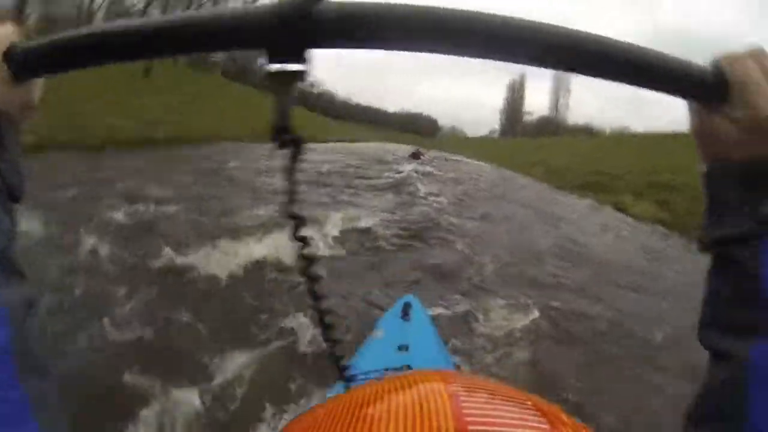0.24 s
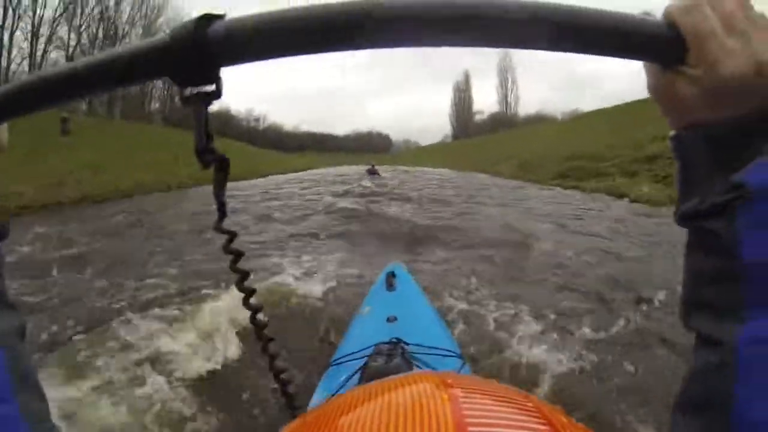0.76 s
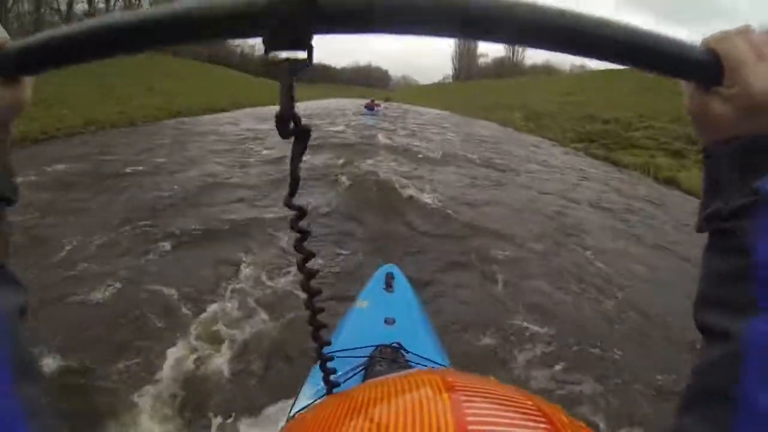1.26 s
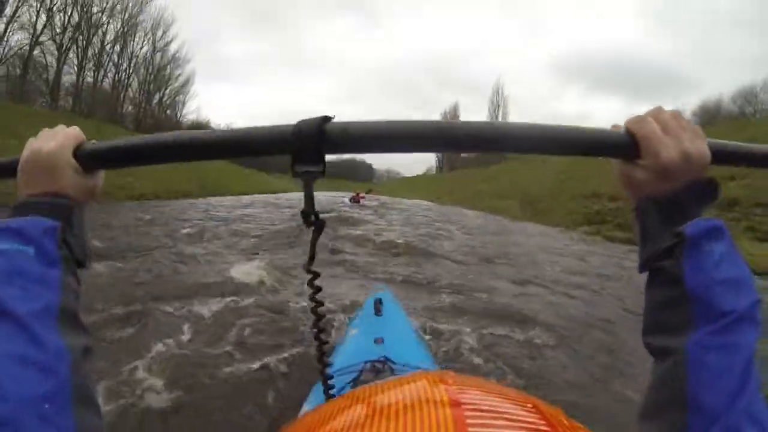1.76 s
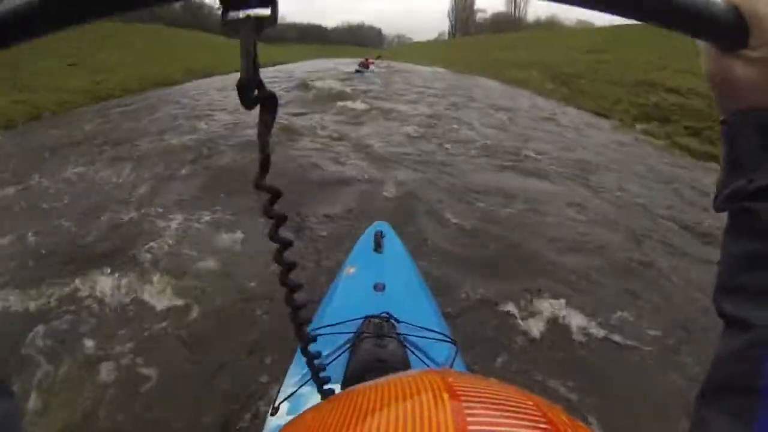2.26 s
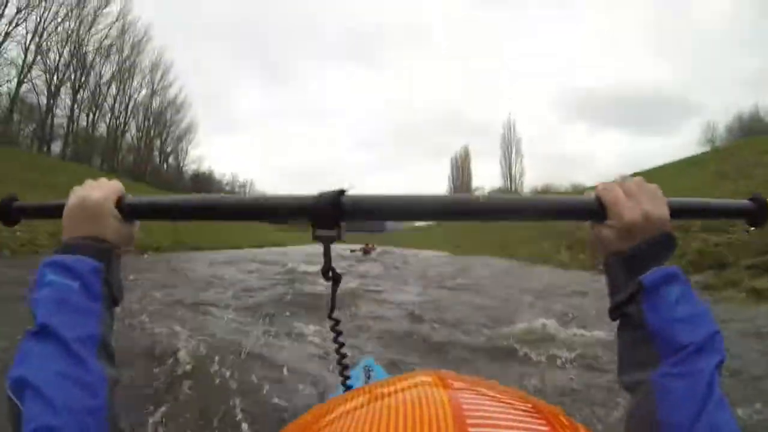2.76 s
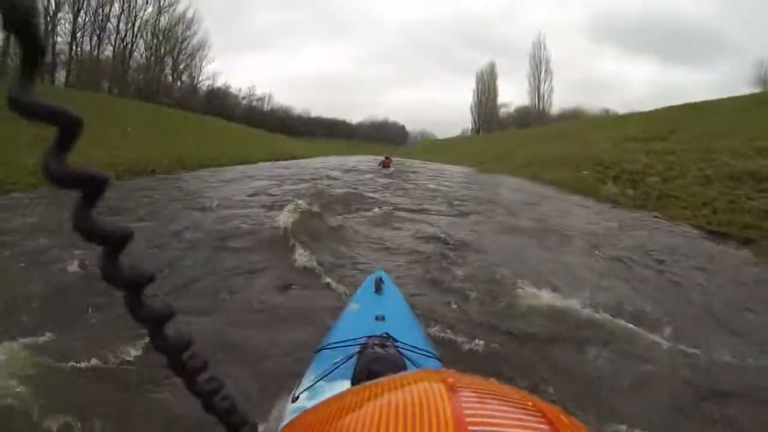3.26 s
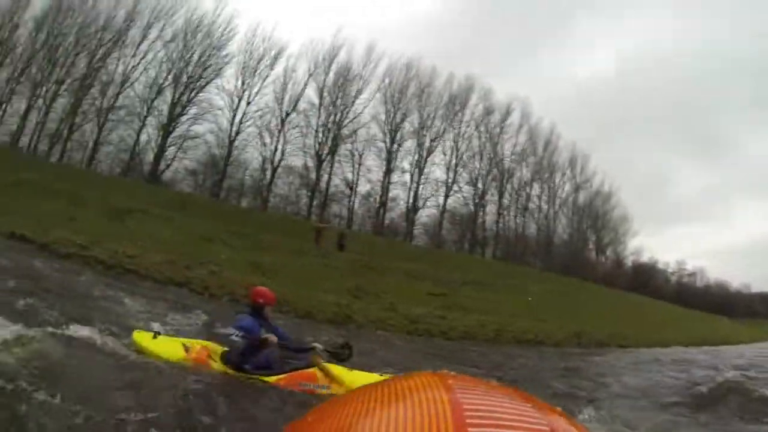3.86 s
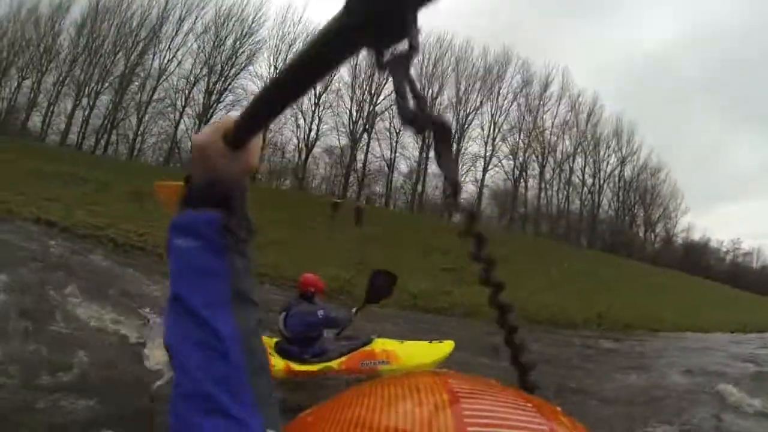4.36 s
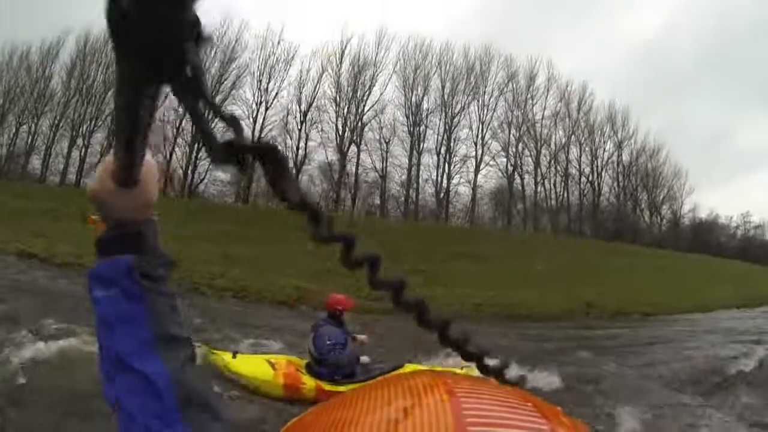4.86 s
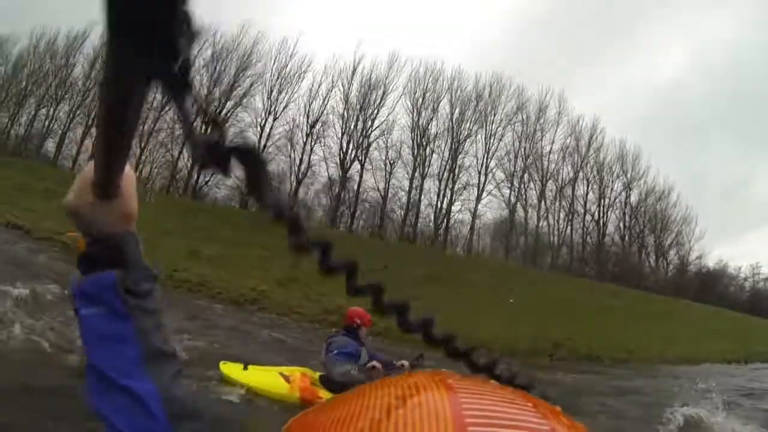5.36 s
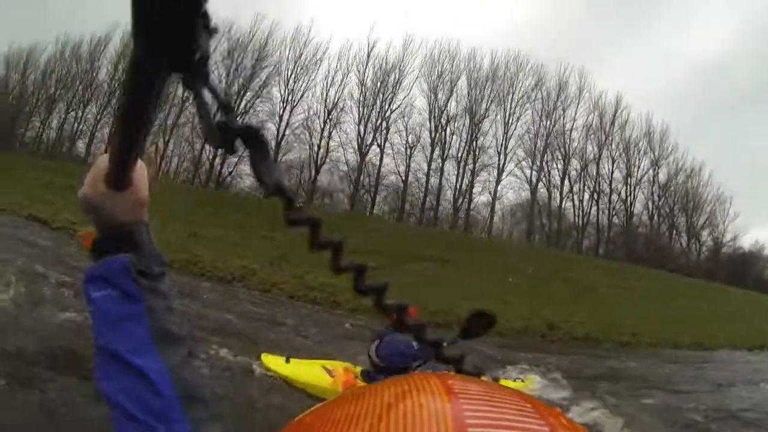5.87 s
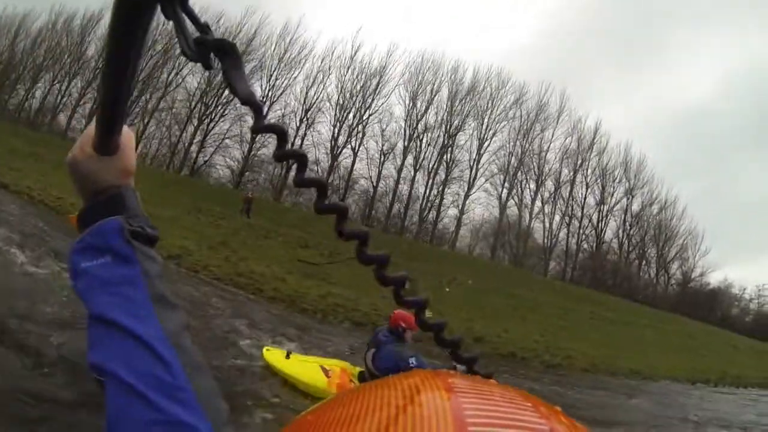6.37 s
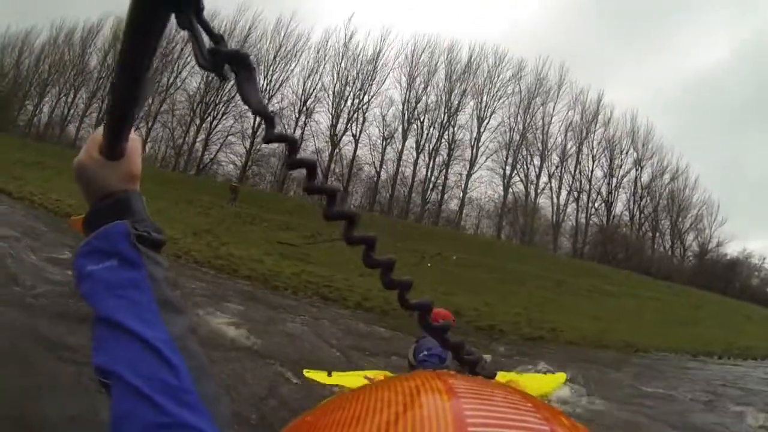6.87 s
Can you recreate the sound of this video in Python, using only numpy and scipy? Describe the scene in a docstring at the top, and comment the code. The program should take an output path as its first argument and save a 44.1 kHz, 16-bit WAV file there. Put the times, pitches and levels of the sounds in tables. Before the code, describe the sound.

A small river rapid rushes and fizzes around a kayak, with splashes slapping close by and low wind gusts buffeting the microphone.

```python
"""First comes the hiss and bubbling of a small river rapid, with wind throbbing deeply under it.
A kayak runs through, heard from a camera on the paddler; its waterproof case colours the water's sound.
Splashes slap the case, water sloshes on the hull, spray sputters and the paddle's leash knocks once.
Wind swirls around the case in low booms and rumbling gusts. Its hardest blows set off the camera's
limiter, an automatic volume control, so the water ducks and swells back."""
import sys
import numpy as np
from scipy import signal
from scipy.fft import rfft, irfft
from scipy.io import wavfile
from scipy.ndimage import uniform_filter1d

SR = 44100
rng = np.random.default_rng(int(sys.argv[2]) if len(sys.argv) > 2 else 0)


def materialize(psi):
    """Save the field psi as 16-bit PCM at rate SR to the path in sys.argv[1].

    A 1-D psi becomes a single channel; in a 2-D psi each row is a channel.
    """
    bounded = np.clip(np.atleast_2d(psi).T, -1, 1)
    quanta = np.round(bounded * 32767).astype(np.int16)
    wavfile.write(sys.argv[1], SR, quanta)


N = 313992

# The river along the run (time [s], rush level [dB], foam level [dB])
RIVER_LEVELS = [(0, -39.5, -56.5), (0.8, -43, -58.5), (1.45, -40, -61.5), (1.8, -43.5, -62),
                (2.65, -44.5, -63), (3.1, -49, -65.5), (3.5, -45, -61.5), (3.8, -50, -61.5),
                (4.05, -44, -61), (4.4, -52.5, -66.5), (4.7, -44, -60.5), (4.95, -45, -62),
                (5.25, -46.5, -61.5), (5.6, -46.5, -61.5), (6.15, -51.5, -69.5), (6.5, -50, -65.5),
                (7.12, -45.5, -63)]
# Waves breaking on the bow (crest time [s], length [s], rush boost [dB], foam boost [dB])
BOW_WAVES = [(0.342, 0.1, 2, 2), (0.77, 0.16, 4, 4), (1.205, 0.11, 2.5, 3), (2.354, 0.039, 6, 7),
             (2.844, 0.17, 4, 5.5), (3.293, 0.14, 3.5, 1.5), (4.46, 0.24, 7, 5), (6.38, 0.21, 7, 3),
             (6.453, 0.024, 1, 7.5)]
# Tone of the rushing water (frequency [Hz], relative level [dB])
RUSH_TONE = [(250, -17.5), (480, -16), (720, -16), (900, -12), (1100, -7), (1330, 0), (1550, -0.5),
             (1900, -9), (2500, -9.5), (3250, -13.5), (3800, -19.5), (4900, -31.5), (6500, -37.5),
             (12000, -45.5)]
# Tone of the fizzing foam (frequency [Hz], relative level [dB])
FOAM_TONE = [(2500, -13), (3900, -2), (4400, 1.5), (5100, 0.5), (5800, -7.5), (7000, -11), (8500, -14.5),
             (12000, -16.5), (14000, -25)]
# Slaps on the case (time [s], strength [dB], trapped air pitch [Hz], hollow ring [dB], bright ring [dB])
WATER_SLAPS = [(1.341, -32, 1520, -45, -30), (1.422, -23.5, 1550, -29, -23), (2.19, -28.5, 1440, -28, 2),
               (2.35, -20, 1440, -14.5, -9), (2.489, -19, 1190, -33, -16), (2.983, -28.5, 1393, -7, -25),
               (3.134, -21.5, 1520, -7, 4.5), (3.149, -15.5, 1340, -7, -26), (3.164, -25, 1230, -5, 0),
               (3.244, -29, 1310, -29, -11), (3.372, -31, 1280, 5, -20), (3.515, -23.5, 1900, -31, -16),
               (4.32, -22, 1250, 3, -18), (4.371, -20.5, 1280, -6.5, -9), (4.64, -22.5, 1210, -3, -31),
               (5.17, -22.5, 1260, -4, -25), (5.196, -20.5, 1310, -4, -22), (5.219, -21.5, 1260, -2.5, -13),
               (5.352, -33, 1250, -10, -23), (5.377, -25, 1140, -3, -13), (5.451, -32.5, 1290, 0, -23),
               (5.489, -21.5, 1150, -9, -22), (5.524, -29, 1130, -13, -22), (5.732, -17, 1450, -10, -22),
               (5.941, -31, 1390, -5, -28), (6.448, -32, 1600, -23, -5)]
# Sloshes against the hull (time [s], strength [dB], pitch [Hz], length [s])
HULL_SLOSHES = [(0.527, -35.5, 1600, 0.0094), (0.552, -33, 1550, 0.018), (0.658, -35.5, 1400, 0.0095),
                (0.662, -35.5, 3100, 0.0079), (0.85, -38.5, 1500, 0.02), (1.04, -46.5, 1450, 0.014),
                (1.171, -42, 1490, 0.018), (2.341, -34.5, 1890, 0.017), (3.976, -40, 1470, 0.019),
                (4.45, -42, 1370, 0.016), (5.471, -35, 1420, 0.01), (5.488, -29, 1290, 0.011),
                (5.524, -33, 1430, 0.014), (5.627, -41, 1380, 0.023), (5.668, -37, 1490, 0.022),
                (5.694, -31, 1530, 0.02), (5.723, -28.5, 1550, 0.016), (5.764, -32, 1560, 0.014),
                (5.815, -39, 1450, 0.026), (5.91, -29.5, 1520, 0.015), (5.94, -34.5, 1470, 0.015),
                (5.983, -38.5, 1350, 0.015), (6.342, -50.5, 2820, 0.028), (6.409, -45.5, 2600, 0.044)]
# Fine spray, thicker after the bow plunges into a wave (time [s], typical rate [drops/s])
SPRAY_RATES = [(2.2, 1), (2.5, 6), (4.2, 10), (4.7, 70), (5.3, 40), (5.7, 75), (6.2, 65), (6.6, 30),
               (6.8, 3)]
# The sharpest drops of spray (time [s], strength [dB])
BIG_DROPS = [(2.4824, -58), (2.605, -38), (3.002, -39.5), (4.158, -41), (4.5164, -44), (4.597, -42),
             (4.63, -39), (4.641, -40), (4.688, -46), (4.7363, -35.5), (4.7938, -46), (4.8115, -40),
             (5.006, -39), (5.068, -45), (5.575, -38), (5.583, -49), (5.6104, -49), (5.663, -46),
             (5.725, -41), (5.8092, -45), (5.815, -39), (5.912, -44), (5.987, -43), (5.991, -41),
             (6.002, -42), (6.0083, -47), (6.0544, -51), (6.062, -41.5), (6.088, -46), (6.153, -44),
             (6.166, -45), (6.447, -45), (6.455, -38), (6.4804, -43), (6.504, -45), (6.534, -51),
             (6.581, -62)]
# The leash hits the case and chatters (time [s], relative strength [dB])
LEASH_HITS = [(4.2426, -4), (4.245, 0), (4.2503, -20)]
# What rings in that knock (pitch [Hz], width [Hz], relative level [dB])
KNOCK_RINGS = [(713, 280, -5.5), (1190, 480, 2), (1470, 98, -23), (2400, 310, -12), (3100, 830, -20)]
# The wind's strength, heard as its throb (time [s], level [dB])
WIND_LEVELS = [(0, -21), (0.3, -28), (0.42, -15.5), (0.66, -18.5), (0.85, -22), (1.5, -31.5), (1.68, -24),
               (2, -29.5), (2.38, -22), (2.56, -14.5), (2.8, -23), (3.4, -19), (3.7, -17), (4, -20.5),
               (4.55, -12.5), (5.35, -15), (5.7, -14), (6.5, -18), (6.8, -22)]
# The hardest blows of wind (time [s], peak before the limiter [dB])
WIND_BLOWS = [(2.611, -6.5), (3.009, -11), (3.613, -7.5), (3.843, -9.5), (4.2, -2), (4.556, 1.5),
              (4.83, -5.5), (5.029, -3.5), (5.321, -4.5), (5.549, -6), (5.751, -5.5), (6.011, -5),
              (6.181, -4), (6.489, -7.5)]
# Booms as the air around the case briefly swings (middle time [s], length [s], strength [dB], pitch [Hz])
WIND_BOOMS = [(0.555, 0.047, -17.5, 29), (0.858, 0.15, -16.5, 30.3), (1.678, 0.07, -16.5, 31.6),
              (2.429, 0.1, -14.5, 29.7), (2.592, 0.081, -19, 63.5), (2.905, 0.066, -13, 35),
              (2.998, 0.051, -21.5, 50), (3.155, .11, -14.5, 33.1), (3.386, 0.092, -13, 31),
              (3.496, 0.085, -12.5, 32.3), (4.078, 0.1, -14.5, 30.4), (4.543, 0.023, -19, 51),
              (5.011, 0.072, -16, 27.6), (5.257, 0.16, -11.5, 26.1), (5.519, 0.1, -14, 27.4)]
# Gusts that catch the case (time [s], length [s], flutter level [dB], buzz pitch [Hz])
WIND_GUSTS = [(0.046, 0.013, -41, 120), (0.42, 0.032, -49, 111), (0.564, 0.039, -49, 149),
              (1.643, 0.04, -42, 140), (1.71, 0.026, -40, 127), (1.828, 0.027, -47, 127),
              (2.054, 0.012, -41.5, 182), (2.25, .1, -48, 100), (2.382, 0.072, -48, 100),
              (2.453, 0.076, -40.5, 114), (2.556, 0.12, -38, 99.5), (2.725, 0.015, -42, 150),
              (2.838, 0.015, -37, 170), (2.888, 0.037, -30, 130), (2.971, 0.014, -26.5, 190),
              (3.128, 0.036, -32, 171), (3.36, 0.053, -31.5, 128), (3.477, 0.022, -31.5, 126),
              (3.537, 0.09, -38, 129), (3.923, 0.013, -39, 109), (4.045, 0.04, -31.5, 169),
              (4.11, 0.12, -42.5, 110), (4.289, 0.038, -31.5, 194), (4.356, 0.053, -35.5, 139),
              (4.51, 0.085, -42, 131), (4.99, 0.13, -39, 130), (5.206, 0.1, -40, 128),
              (5.352, 0.012, -26.5, 130), (5.435, 0.18, -42, 111), (6.414, 0.03, -45, 171),
              (7.08, 0.042, -43, 118)]
# Tone of the crackle that pulses with the throb (frequency [Hz], relative level [dB])
CRACKLE_TONE = [(70, 18), (130, 5.5), (250, 4), (450, -1.5), (750, -3.5), (1100, -7), (2500, -14.5),
                (6000, -33), (12000, -46.5)]
# Tone of the wind's rumble (frequency [Hz], relative level [dB])
RUMBLE_TONE = [(16, 15.5), (24, 1.5), (33, 2.5), (45, -4.5), (65, -42.5), (100, -41.5), (200, -42.5)]
# Tone of the wind's flutter (frequency [Hz], relative level [dB])
FLUTTER_TONE = [(60, 10.5), (85, 1.5), (120, 8), (180, -4.5), (260, -18), (380, -32), (700, -21.5),
                (1500, -24.5)]
# Two ways the case rings (pitch [Hz], width [Hz])
HOLLOW_RING, BRIGHT_RING = (820, 320), (2550, 340)


def river():
    """Nearby bubbles ring over the rapid's smooth rush and bursting foam fizzes; waves swell both."""
    rush_db, fizz_db = in_time(RIVER_LEVELS)
    for s, length, rush_boost_db, foam_boost_db in BOW_WAVES:
        swell = np.exp(-(2 * (np.arange(N) / SR - s) / length) ** 2)
        rush_db, fizz_db = rush_db + rush_boost_db * swell, fizz_db + foam_boost_db * swell
    water = rng.standard_normal(N) + from_db(-8) * bubbles(per_s=1800, spread_db=2, cycles=38)
    # clouds of same-sized bubbles come and go, so the tone keeps shifting
    clouds = sum(0.078 * drift(23) * resonance(water, hz, 0.33 * hz) for hz in (1230, 1600, 2200, 3100))
    rush = coloured(water + clouds, RUSH_TONE) * from_db(rush_db + 1.05 * drift(27))
    foam = rng.standard_normal(N) + from_db(-6) * rms_one(grains(per_s=2000, spread_db=6.5))
    fizz = coloured(foam, FOAM_TONE) * from_db(fizz_db + 1.9 * drift(30))
    return rush + fizz


def bubbles(per_s, spread_db, cycles, count=40):
    """Each bubble rings briefly at a pitch set by its size."""
    births, sizes = grains(per_s, spread_db), rng.integers(0, count, N)
    rings = (np.sqrt(hz) * rms_one(resonance(births * (sizes == k), hz, 2 * hz / cycles))
             for k, hz in enumerate(np.geomspace(600, 7000, count)))
    return rms_one(sum(rings))


def slaps(size=2400):
    """A lump of water lands amid a short spatter: its trapped air and the case ring together."""
    lead = int(0.003 * SR)
    out, t = np.zeros(N + size), (np.arange(size) - lead) / SR
    for s, db, air_hz, hollow_db, bright_db in WATER_SLAPS:
        push = from_db(-25) * rng.standard_normal(size) * np.exp(-np.abs(t) / 0.0045)
        push[lead] = 1  # the lump itself
        rings = [(air_hz, 450, 0), (*HOLLOW_RING, hollow_db), (*BRIGHT_RING, bright_db)]
        slap = sum(from_db(ring_db) * rms_one(ring(push, hz, width)) for hz, width, ring_db in rings)
        slap = cut(slap, 1850, "low", order=3)
        at = int(s * SR) - lead
        out[at:at + size] += from_db(db) * slap / np.abs(slap).max()
    return out[:N]


def sloshes(size=6000, pockets=50):
    """Water folds against the hull: pockets of air rattle unevenly over a hollow gurgle."""
    gap_s, ring_s, spread_octaves, spread_db, gurgle_db = 0.002, 0.0008, 0.15, 3, -17
    out, t = np.zeros(N + size), np.arange(size) / SR
    gurgles = ring(rng.standard_normal((len(HULL_SLOSHES), size)), *HOLLOW_RING)
    for (s, db, hz, length), gurgle in zip(HULL_SLOSHES, gurgles):
        late, detune, strength = rng.standard_normal((3, pockets, 1))
        since = np.maximum(t - gap_s * (np.arange(pockets)[:, None] + 0.327 * late), 0)
        pocket_hz = hz * 2 ** (spread_octaves * detune)
        rings = since * np.exp(-since / ring_s) * np.sin(2 * np.pi * pocket_hz * since)
        rattle = np.sum(from_db(spread_db * strength) * rings, axis=0)
        age = t / (length / 2)
        swell = (age * np.exp(1 - age)) ** 2
        slosh = shaped(rattle, swell) + from_db(gurgle_db) * shaped(gurgle, swell)
        at = int(s * SR)
        out[at:at + size] += from_db(db) * slosh
    return out[:N]


def leash_knock():
    """The paddle's leash clacks: a few quick hits make the case ring."""
    hits = np.zeros(N)
    for s, db in LEASH_HITS:
        hits[int(s * SR)] = from_db(db)
    clack = sum(from_db(db) * rms_one(ring(hits, hz, width)) for hz, width, db in KNOCK_RINGS)
    clack = cut(clack, 2500, "low", order=4)
    return from_db(-3) * clack / np.abs(clack).max()


def spray(splinters=3, gap_s=0.0012, loss_db=6.5):
    """Fine drops crackle on the case in bunches; big ones break into ever weaker splinters."""
    per_s, = in_time(SPRAY_RATES)
    drops = grains(per_s * from_db(3 * drift(25)), spread_db=3)
    clicks = from_db(-45) * np.tanh(drops / 2)
    for s, impact_db in BIG_DROPS:
        gaps = rng.uniform(0.35, 2, splinters)
        at = ((s + gap_s * np.cumsum([0, *gaps])) * SR).astype(int)
        clicks[at] += from_db(impact_db - loss_db * np.arange(splinters + 1))
    snap = from_db(10) * resonance(clicks, 4300, 2200)
    tap = from_db(22) * resonance(clicks, 1600, 570)
    thud = from_db(29) * resonance(clicks, 440, 500)
    return cut(snap + tap + thud, 7800, "low")


def wind_throb(blow_hz=12.76, octave_db=-22):
    """Swirls of air peel off the case and throb; a blow is one big swirl, a boom a faster swing."""
    wind_db, = in_time(WIND_LEVELS)
    wind_gain = from_db(wind_db)
    swirls = evened(cut(rng.standard_normal(N + SR), [10.5, 17], "band"), 0.129)[SR:] * wind_gain
    t, booms, wander = np.arange(N) / SR, 0, 0.32 * drift(22.5)
    for s, length, db, hz in WIND_BOOMS:
        share = np.exp(-(2 * (t - s) / length) ** 2)
        phase = 2 * np.pi * (hz * (t - s) + rng.random()) + wander
        booms += share * from_db(db) * (np.cos(phase) + from_db(octave_db) * np.cos(2 * phase))
        swirls *= 1 - share  # the throb makes way for the boom
    for s, peak_db in WIND_BLOWS:
        share = envelope(s, hold_s=0, attack_s=0.012, release_s=0.076)
        blow = rng.choice([-1, 1]) * from_db(peak_db) * np.cos(2 * np.pi * blow_hz * (t - s))
        swirls = (1 - share) * swirls + share * blow
    # a fine crackle swells at each crest and trough of the throb
    pulsing = 0.35 + 0.65 * np.minimum((swirls / wind_gain) ** 2, 3)
    crackle = from_db(-29) * coloured(grains(per_s=830, spread_db=2.5), CRACKLE_TONE)
    return swirls + booms + crackle * pulsing * wind_gain


def wind_rumble(buzz_db=-5.5):
    """Smaller swirls rumble and flutter on the case; a gust lifts the flutter and adds a low buzz."""
    wind_db, = in_time(WIND_LEVELS)
    swing_db = wind_db - wind_db.mean()
    rumble_gain = from_db(-23.5 + 0.37 * swing_db)
    flutter_gain = from_db(-52 + 1.78 * swing_db)
    swirls, buzz = cut(rng.standard_normal(N), 276, "low", order=6), 0
    for s, length, flutter_db, hz in WIND_GUSTS:
        gust = envelope(s, hold_s=length, attack_s=0.0092, release_s=0.011)
        flutter_gain = np.maximum(flutter_gain, from_db(flutter_db) * gust)
        buzz += from_db(flutter_db + buzz_db) * shaped(resonance(swirls, hz, 0.4 * hz), gust)
    rumble = evened(coloured(rng.standard_normal(N), RUMBLE_TONE), 0.0546) * from_db(2 * drift(3.5))
    flutter = evened(coloured(rng.standard_normal(N), FLUTTER_TONE), 0.0366) * from_db(1.8 * drift(22))
    return rumble * rumble_gain + flutter * flutter_gain + buzz


def case_wall(x):
    """The wall lets little through below its hollow ring or between the two higher rings."""
    return cut(x - 0.85 * resonance(x, 1950, 500), 560, "high", order=3)


def limiter(x, limit_db=-12.5, attack_s=0.0023, release_db_per_s=65):
    """The volume drops when the sound passes the limit, then climbs back at a steady rate."""
    size = int(attack_s * SR)
    level = np.abs(uniform_filter1d(np.abs(x[0]), size))
    over_db = np.maximum(20 * np.log10(level + 1e-9) - limit_db, 0)
    climb_db = release_db_per_s * np.arange(N) / SR
    gain_db = climb_db - np.maximum.accumulate(over_db + climb_db)
    return x * from_db(uniform_filter1d(gain_db, size))


def from_db(db):
    """Turn decibels into a number to multiply by."""
    return 10 ** (np.asarray(db) / 20)


def rms_one(x):
    """Scale a sound so its average strength (rms) is one."""
    return x / np.sqrt(np.mean(x ** 2) + 1e-20)


def in_time(rows):
    """Join a table's points with straight lines: one curve for each column after the time."""
    s, *columns = np.transpose(rows)
    return [np.interp(np.arange(N) / SR, s, c) for c in columns]


def drift(rate_hz):
    """A smooth random wobble, about one in size."""
    r = np.exp(-80 * np.pi * rate_hz / SR)
    slow = signal.lfilter([1], [1, -2 * r, r * r], rng.standard_normal(N // 40 + 2002))[2000:]
    return np.interp(np.arange(N) / 40, np.arange(len(slow)), rms_one(slow))


def grains(per_s, spread_db):
    """Clicks at random moments, many small and a few large."""
    sizes = from_db(spread_db * np.minimum(rng.exponential(1, N), 5)) * rng.choice([-1, 1], N)
    return sizes * (rng.random(N) < per_s / SR)


def cut(x, hz, kind, order=2):
    """Keep the lows, the highs or a band; a higher order cuts more sharply."""
    return signal.sosfilt(signal.butter(order, hz, kind, fs=SR, output="sos"), x)


def resonance(x, hz, width_hz):
    """Make a sound ring at one pitch; a narrower width rings longer."""
    r = np.exp(-np.pi * width_hz / SR)
    feedback = [1, -2 * r * np.cos(2 * np.pi * hz / SR), r * r]
    return signal.lfilter(np.array([1, 0, -1]) * (1 - r * r) / 2, feedback, x + 1e-18)


def ring(x, hz, width_hz):
    """Two resonances in a row: the ring swells for a moment before it dies."""
    return resonance(resonance(x, hz, width_hz), hz, width_hz)


def coloured(x, tone):
    """Shape a sound with a tone table, fading 30 dB an octave past its ends; strength one."""
    hz, db = np.transpose(tone)
    octave = np.log2(np.maximum(np.arange(N // 2 + 1) * SR / N, 1))
    beyond = np.abs(octave - np.clip(octave, np.log2(hz[0]), np.log2(hz[-1])))
    gain = from_db(np.interp(octave, np.log2(hz), db) - 30 * beyond)
    return rms_one(irfft(rfft(x) * gain, N))


def evened(x, seconds):
    """Hold the strength of a noise steady over the given time."""
    return x / np.sqrt(np.abs(uniform_filter1d(x * x, int(seconds * SR))) + 1e-9)


def envelope(start, hold_s, attack_s, release_s):
    """A loudness curve that rises to one by the start time, holds, then dies away."""
    t = np.arange(N) / SR - start
    rise, fall = (np.minimum(t, 0) / attack_s) ** 2, np.maximum(t - hold_s, 0) / release_s
    return np.exp(-np.minimum(rise + fall, 20))


def shaped(x, shape):
    """Make a noise follow a loudness curve, with strength one where the curve is one."""
    return rms_one(x * shape) * np.sqrt(np.mean(shape ** 2))


def scene():
    """Water and wind at one microphone."""
    water = river() + case_wall(slaps() + sloshes() + leash_knock()) + spray()
    return (water + wind_throb() + wind_rumble())[None]


def record(dry):
    """The camera turns loud moments down and sharply cuts the highest treble."""
    return cut(limiter(dry), 13600, "low", order=12)


dry = scene()
out = record(dry)
materialize(out)
```